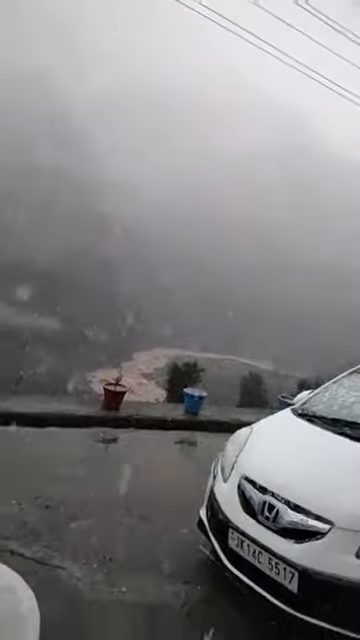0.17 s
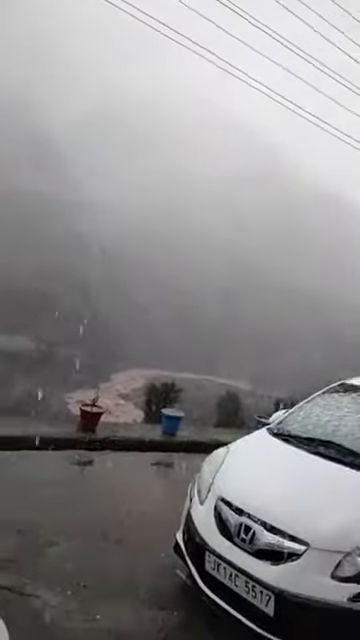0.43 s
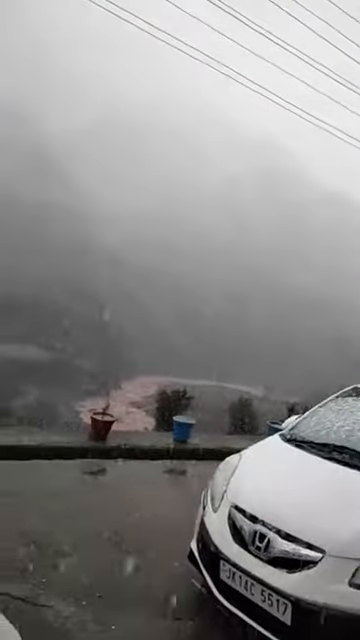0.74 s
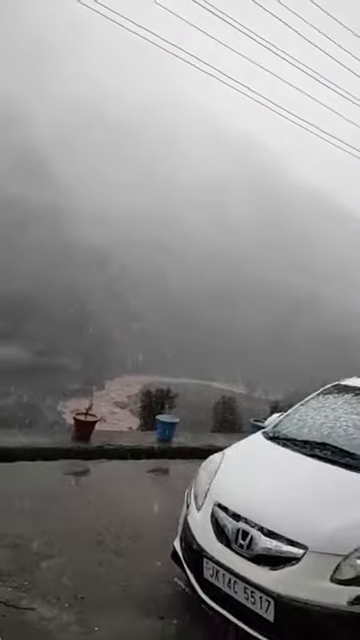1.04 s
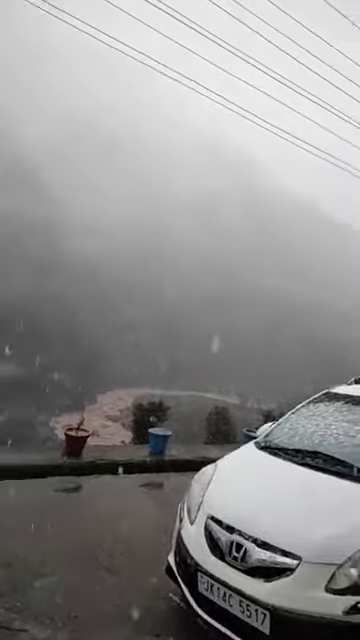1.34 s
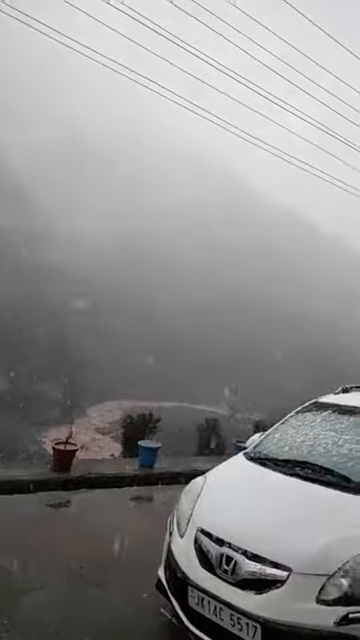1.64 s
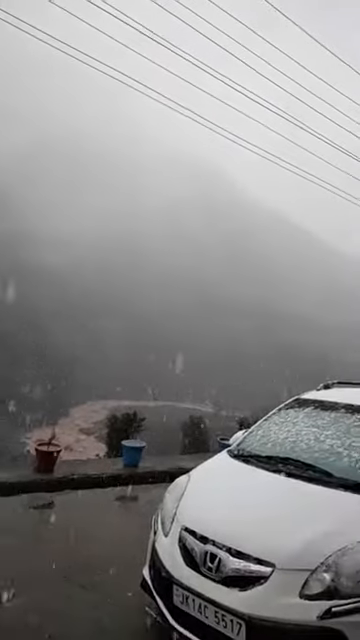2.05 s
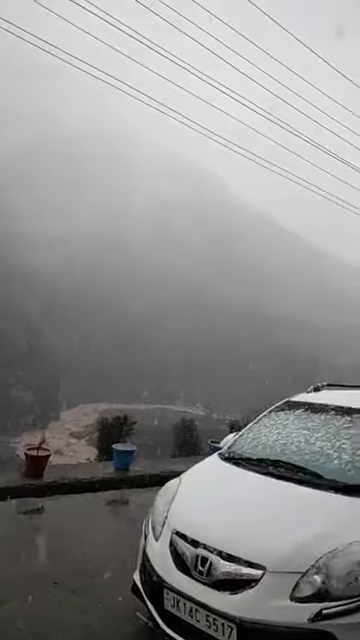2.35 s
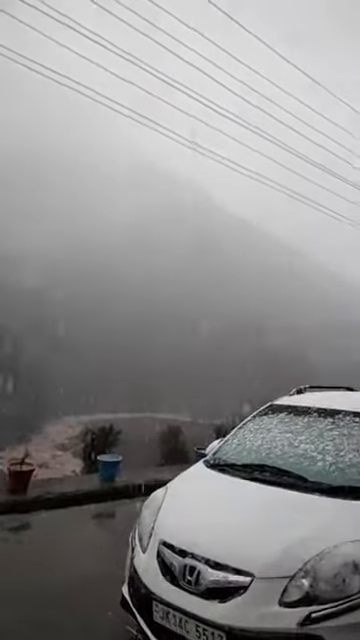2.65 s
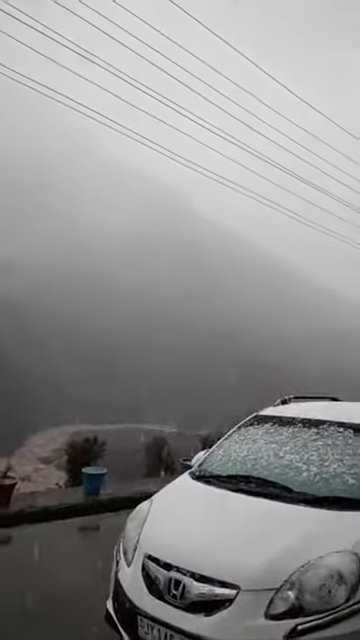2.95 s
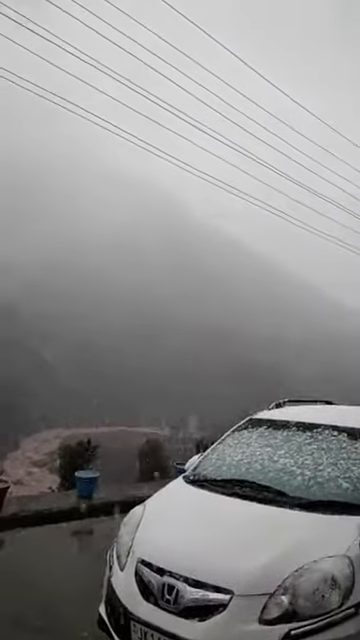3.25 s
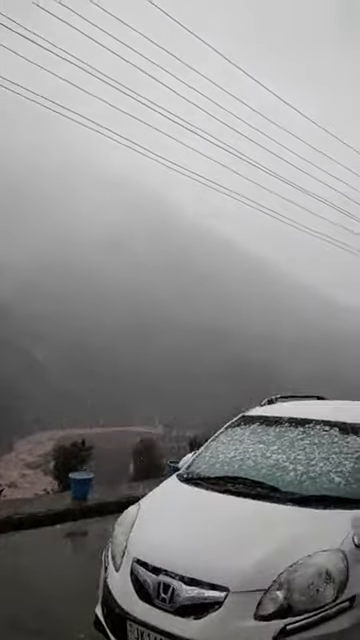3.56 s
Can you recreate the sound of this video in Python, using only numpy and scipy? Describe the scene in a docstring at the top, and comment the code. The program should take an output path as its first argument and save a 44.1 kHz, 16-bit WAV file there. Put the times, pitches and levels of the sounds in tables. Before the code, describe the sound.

Irregular sharp clicks of slushy sleet, each bursting into fine ticks, over continuous soft hiss and a low wavering hum outdoors, heard close on a bright phone microphone with two short silent dropouts.

```python
"""Near slushy pellets of sleet click and burst into short sprays of ticks, over the hiss of countless far impacts.
The place is a wet paved yard beside a parked car, with a low valley rumble and an engine-like hum behind.
Pellets are damped sines, hiss and rumble are patchy coloured noise, and the hum is a wavering tone with partials.
A phone microphone with a bright port resonance hears it all, and its sound drops out twice."""
import sys
import numpy as np
from scipy import signal
from scipy.fft import rfft, irfft, next_fast_len
from scipy.io import wavfile
from scipy.ndimage import uniform_filter1d, map_coordinates

SR = 44100
rng = np.random.default_rng(int(sys.argv[2]) if len(sys.argv) > 2 else 0)


def to_linear_factor(level_db):
    """Convert decibel levels (scalar or array-like) to linear amplitude factors."""
    exponent = np.asarray(level_db, float) / 20
    return 10 ** exponent


def dump_mix(stems):
    """Bounce the given channels to the path in sys.argv[1] as a 16-bit WAV at rate SR."""
    frames = np.atleast_2d(stems).T  # one column per channel
    limited = np.clip(frames, -1, 1)  # hard clip at full scale
    pcm = np.round(limited * 32767).astype(np.int16)
    wavfile.write(sys.argv[1], SR, pcm)


N = 163170  # length in samples


def sprays(rows, count):
    """Each pellet lands with one blunt click, then bursts into damped ticks, the later the weaker."""
    impact_pitch = 0.72  # the landing click sounds lower than its spray
    impact_cycles, tick_cycles = 0.65, 2.15  # cycles in which the ringing falls to 1/e
    pitch_spread, tick_scatter_db = 0.11, 4  # random spread of log pitch and of level, from tick to tick
    fade_db = 1.5  # loss per spray length of delay

    start_s, impact_db, spray_db, hz, spray_s = np.transpose(rows)[:, :, None]
    shape = (len(start_s), count)
    is_impact = np.arange(count) == 0
    # Exponentially distributed delays, in spray lengths; the impact has none.
    delay = -np.log(1 - rng.random(shape)) * ~is_impact
    pitch_ratio = np.exp(pitch_spread * rng.standard_normal(shape))
    scatter_db = tick_scatter_db * rng.standard_normal(shape)

    start = np.round((start_s + delay * spray_s) * SR).astype(int)[..., None]
    tick_hz = hz * np.where(is_impact, impact_pitch, pitch_ratio)
    tick_hz = np.clip(tick_hz, 1000, SR / 2.5)[..., None]
    tick_db = spray_db - fade_db * delay + scatter_db
    gain = to_linear_factor(np.where(is_impact, impact_db, tick_db))[..., None]
    cycles = np.where(is_impact, impact_cycles, tick_cycles)[:, None]

    k = np.arange(80)  # samples within a tick
    turns = tick_hz * k / SR
    ticks = gain * np.sin(2 * np.pi * turns) * np.exp(-turns / cycles)
    return np.bincount((start + k).ravel(), ticks.ravel(), minlength=N)[:N]


# The loudest pellets, landing near the microphone. Each row: start in seconds, impact level in dB,
# spray level in dB, spray pitch in Hz, spray length (mean tick delay) in seconds.
NEAR_PELLETS = [(.027, -33, -54.5, 8050, 0.008), (.04, -45.5, -52.5, 5500, 0.022),
                (.183, -33, -61, 10600, .005), (.225, -50, -53.5, 10800, .012),
                (.288, -49.5, -65, 9500, 0.011), (.327, -31, -53, 8600, 0.013),
                (.423, -52, -52, 11200, .008), (.508, -46.5, -49.5, 11000, 0.014),
                (.657, -47, -59, 10300, .006), (.674, -36, -54.5, 8515, 0.0036),
                (.679, -38, -52.5, 8400, 0.015), (.745, -40, -49, 8800, .014),
                (1.045, -46, -58, 10100, .008), (1.083, -33, -49, 10500, .02),
                (1.214, -47, -50.5, 11000, .006), (1.295, -42.5, -49.5, 10500, .008),
                (1.336, -49, -54, 10500, 0.036), (1.570, -49, -57.5, 11300, .008),
                (1.646, -49, -58.5, 10400, .01), (1.7, -31, -55.5, 8960, 0.0068),
                (2.176, -44, -59, 11000, 0.0078), (2.201, -48, -50, 10070, .012),
                (2.220, -38, -55, 7000, .006), (2.269, -48.5, -56.5, 10700, .006),
                (2.343, -41.5, -53.5, 10600, .012), (2.430, -45, -56, 11150, .015),
                (2.477, -48, -54.5, 9960, .014), (2.621, -44.5, -51, 10600, 0.014),
                (2.733, -48.5, -49, 10800, .012), (2.761, -44, -56, 8400, .008),
                (2.9355, -49, -41.5, 11950, .009), (2.938, -35, -60, 6000, 0.013),
                (2.977, -39.5, -53, 5470, .012), (3.007, -28.5, -49, 6550, 0.0024),
                (3.126, -35.5, -52, 10100, .012), (3.28, -53, -47.5, 10800, 0.032),
                (3.312, -31, -49.5, 10900, 0.0085), (3.402, -47, -56, 9500, .015),
                (3.499, -35, -58, 10600, 0.0036), (3.585, -45.5, -55.5, 9500, .012)]


def near_pellets():
    """Single slushy pellets that strike close by, each with a dense spray of ticks."""
    return sprays(NEAR_PELLETS, count=90)


# Swell of the small pellets in the treble, before their common offset and scatter.
# Each row: time in seconds, level in dB.
PATTER_SWELL = [(0, -57.5), (.3, -54.5), (.55, -54), (.7, -59.5), (.9, -53.5), (1.15, -54.5), (1.38, -53.5),
                (1.5, -62), (1.62, -52.5), (1.8, -59), (2.0, -50), (2.25, -60), (2.55, -59), (2.78, -58),
                (3.05, -61), (3.2, -59.5), (3.45, -55.5), (3.65, -55)]


def patter():
    """Smaller pellets landing at random moments, each a short spray of a few ticks."""
    count, spray_s = 1400, 0.0064
    offset_db, scatter_db, impact_above_spray_db = -7, 4, 5
    centre_hz, pitch_spread = 10400, 0.14  # spread of log pitch
    start_s = rng.random(count) * N / SR
    size = rng.standard_normal(count)
    hz = centre_hz * np.exp(pitch_spread * rng.standard_normal(count))
    spray_db = np.interp(start_s, *np.transpose(PATTER_SWELL)) + offset_db + scatter_db * size
    impact_db = spray_db + impact_above_spray_db
    rows = np.transpose([start_s, impact_db, spray_db, hz, np.full(count, spray_s)])
    return sprays(rows, count=8)


def unit(x):
    """Scale to rms 1."""
    return x / np.sqrt(np.mean(x ** 2) + 1e-20)


def curves(rows):
    """One value per sample for each column after the time."""
    s, *columns = np.transpose(rows)
    return [np.interp(np.arange(N) / SR, s, column) for column in columns]


def wobble(rate):
    """A smooth random curve, rate knots a second."""
    knots = rng.standard_normal(int(N * rate / SR) + 4)
    return map_coordinates(knots, [np.arange(N) * rate / SR])


def filtered(x, response):
    """x times a response of frequency."""
    m = next_fast_len(N + 8192)
    return irfft(rfft(x, m) * response(np.fft.rfftfreq(m, 1 / SR)), m)[..., :N]


def rush(spectrum, patchy_db, size):
    """Coloured noise of rms 1 with patches of random gain; size in samples sets their grain."""
    z = signal.stft(rng.standard_normal(N), nperseg=size)[2]
    # Smooth the random gains over neighbouring frequencies, then over time.
    field = uniform_filter1d(rng.standard_normal(z.shape), size=4, axis=0)
    field = uniform_filter1d(field, size=6, axis=1)
    noise = signal.istft(z * to_linear_factor(patchy_db * unit(field)), nperseg=size)[1][:N]
    f, level_db = np.transpose(spectrum)
    colour = lambda hz: to_linear_factor(np.interp(np.log(hz + 1), np.log(f + 1), level_db))
    return unit(filtered(noise, colour))


# Colour of the far sleet. Each row: frequency in Hz, relative density in dB per Hz.
HISS_COLOUR = [(150, -40), (250, -4), (484, -4.5), (624, -8.5), (818, -8), (890, -10.5), (1210, -8),
               (1970, -11), (2720, -19), (4200, -24), (6340, -28), (8600, -33), (10700, -32), (12500, -33),
               (14300, -33)]
# Swell of the far sleet ahead of the microphone. Each row: time in seconds, level in dB.
HISS_SWELL = [(0, -47), (.9, -47), (1.9, -47), (2.4, -47), (3.0, -46), (3.7, -47.5)]


def hiss():
    """Countless far impacts on wet ground merge into patchy noise."""
    level_db, = curves(HISS_SWELL)
    return to_linear_factor(level_db + 0.61 * wobble(3)) * rush(HISS_COLOUR, patchy_db=1.2, size=768)


# Colour of the valley rumble. Each row: frequency in Hz, relative density in dB per Hz.
RUMBLE_COLOUR = [(12, -39), (20, -2), (38, -2), (52, -4), (80, -2), (100, -1.5), (120, -3.5), (145, -2),
                 (200, -1.5), (235, -10), (300, -13.5), (390, -26), (660, -120)]
# Swell of the valley rumble ahead of the microphone. Each row: time in seconds, level in dB.
RUMBLE_SWELL = [(0, -41.5), (.5, -43.5), (1, -41.5), (1.5, -40.5), (2, -43), (2.5, -42), (3, -43),
                (3.7, -42.5)]


def rumble():
    """Low roar of weather and distant traffic, as slowly varying low noise."""
    level_db, = curves(RUMBLE_SWELL)
    return to_linear_factor(level_db + 0.31 * wobble(2.5)) * rush(RUMBLE_COLOUR, patchy_db=2, size=4096)


# Course of the hum, before its random waver. Each row: time in seconds, pitch in Hz,
# level of the main tone in dB, unsteadiness as a plain factor (1 gives the full waver).
HUM_COURSE = [(0, 68.5, -50, 1.05), (.6, 68.55, -48, 1.01), (1.2, 69, -49, 1.08), (1.7, 69.4, -42.5, 0.43),
              (2.3, 69.06, -45, 0.56), (2.6, 68.03, -44, 0.5), (2.9, 68.3, -41.5, 0.2),
              (3.3, 67.64, -39, .3), (3.7, 68.2, -43, 0.5)]
# Weaker partials. Each entry: multiple of the pitch, mean level in dB relative to the main tone.
HUM_PARTIALS = {1.5: -15, 2: -9, 2.5: -14.5, 3: -14}


def hum():
    """A low wavering tone with weaker, unsteady partials, as from a distant idling engine."""
    waver_db, drift_hz, partial_waver_db = 3.5, 1.4, 4
    hz, level_db, unsteady = curves(HUM_COURSE)
    phase = 2 * np.pi * np.cumsum(hz + drift_hz * unsteady * wobble(9)) / SR
    tone = np.sin(phase)
    for multiple, partial_db in HUM_PARTIALS.items():
        tone = tone + to_linear_factor(partial_db + partial_waver_db * wobble(4.1)) * np.sin(multiple * phase)
    gain = to_linear_factor(level_db + waver_db * unsteady * wobble(7.6))
    return np.sqrt(2) * gain * tone  # a sine of rms 1 has peak sqrt(2)


def scene():
    """All layers, one channel."""
    return (near_pellets() + patter() + hiss() + rumble() + hum())[None]


def microphone(x):
    """The port adds a resonant band to the direct sound, and nothing passes above the top frequency."""
    port_hz, width_hz, top_hz = 10600, 2280, 14350
    port_db = 9.5  # peak of the added band, relative to the direct sound

    def response(hz):
        """Direct sound plus a second-order resonance, cut off at the top."""
        damping = 1j * hz * width_hz
        port = 1 + to_linear_factor(port_db) * damping / (port_hz ** 2 - hz ** 2 + damping)
        return port * (hz < top_hz)

    return filtered(x, response)


# Silent gaps in the microphone's sound. Each row: start in seconds, end in seconds.
GAPS = [(2.0468, 2.1552), (3.6248, 3.8)]


def drop_out(x):
    """The sound falls to silence in each gap, with short straight ramps at both edges."""
    edge_s = 0.0006
    t = np.arange(N) / SR
    for start, end in GAPS:
        outside_s = np.maximum(start - t, t - end)  # negative inside the gap
        x = x * np.clip(outside_s / edge_s + 0.5, 0, 1)
    return x


def roll_off(x):
    """The treble ends steeply here."""
    return signal.sosfilt(signal.butter(12, 15610, fs=SR, output="sos"), x)


def record(dry):
    """The phone hears the yard through its port, and its sound drops out twice."""
    heard = microphone(dry)
    mix = drop_out(heard)
    return roll_off(mix)


dry = scene()
out = record(dry)
dump_mix(out)
```